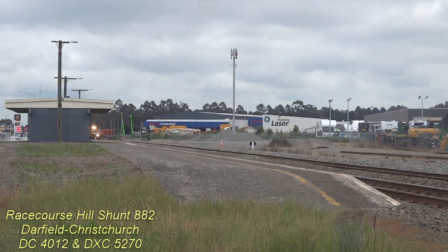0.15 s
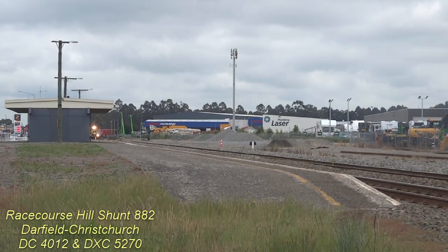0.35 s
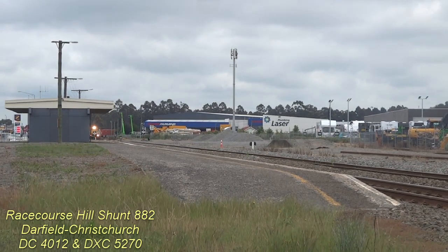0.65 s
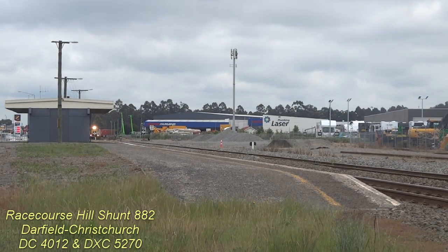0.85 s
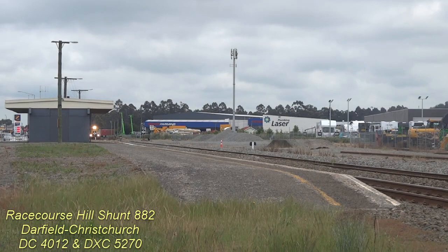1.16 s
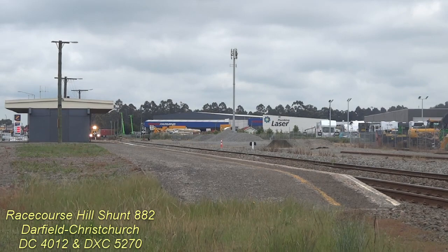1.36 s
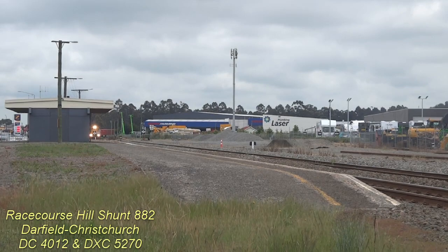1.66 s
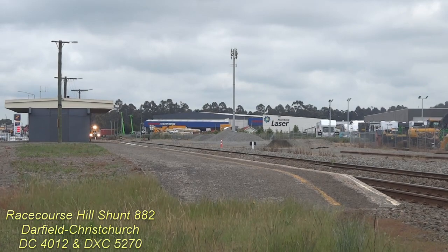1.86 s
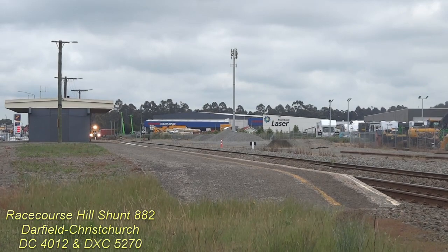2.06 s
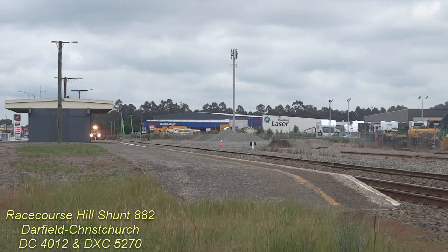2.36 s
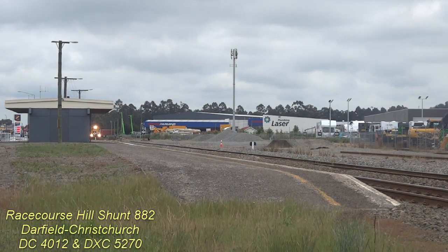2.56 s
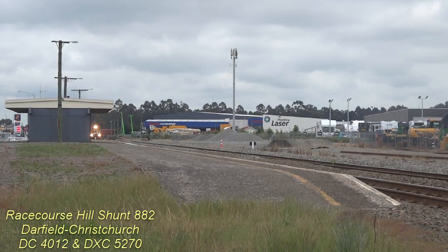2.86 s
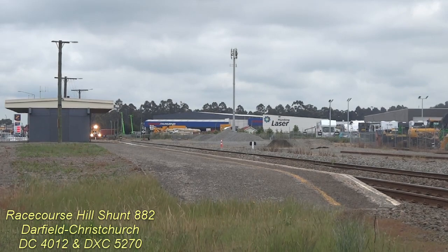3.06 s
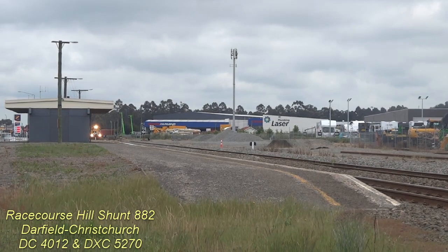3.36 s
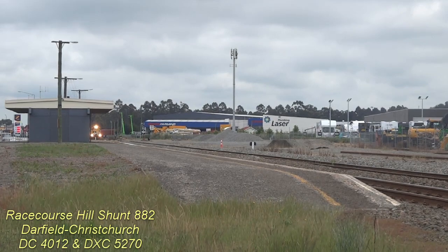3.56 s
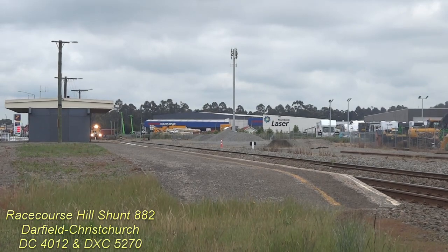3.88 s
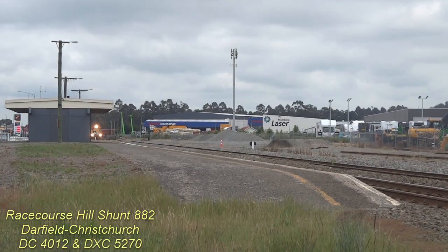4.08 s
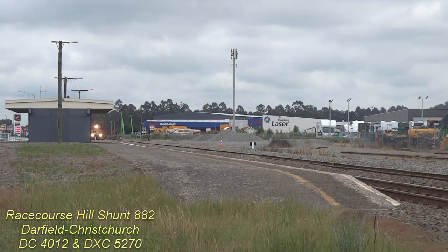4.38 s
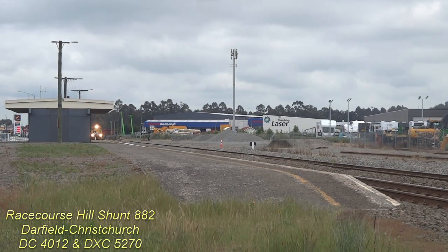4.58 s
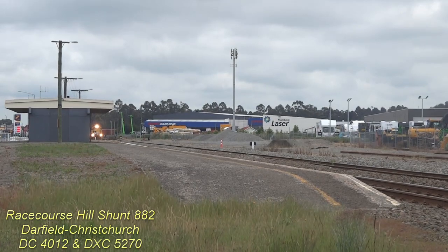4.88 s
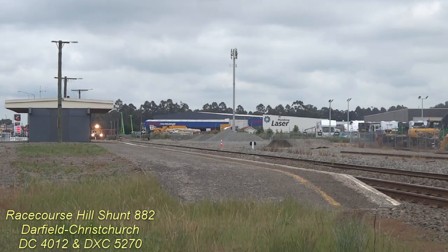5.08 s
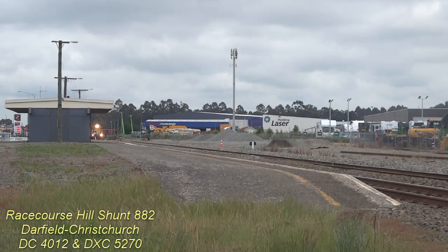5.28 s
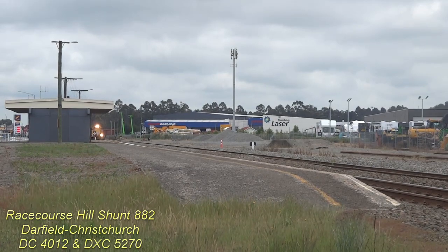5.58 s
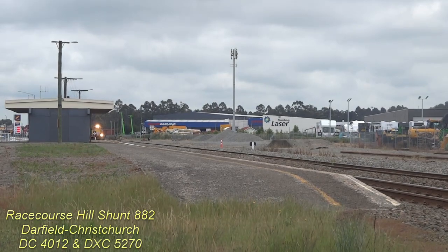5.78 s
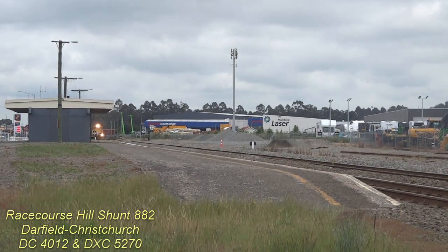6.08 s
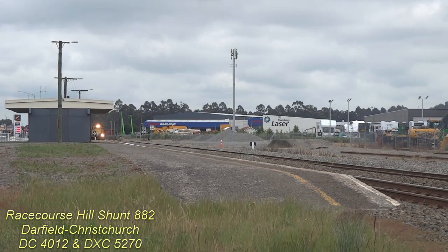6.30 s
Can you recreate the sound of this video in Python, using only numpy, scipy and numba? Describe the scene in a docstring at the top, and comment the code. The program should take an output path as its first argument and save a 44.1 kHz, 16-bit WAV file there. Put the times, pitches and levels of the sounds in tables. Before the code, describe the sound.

Crossing bells ring out of step as a far-off diesel train throbs and hisses, under gusts thudding on the microphone.

```python
"""From the start, gusts buffet both ports of a microphone beside a railway, while far off a diesel train
rumbles over road and yard noise, air escapes in blasts and two crossing bells clang out of step.
Near 0.7 s a bird chirps and two low tones sound. From 1.5 s the far sound dips under some hard gusts.
An air brake whistles at 2 s, chains jingle at 3.5 s, and the bird returns after 5.3 s.
Throughout, a limiter holds the peaks of the wind."""
import sys
import numpy as np
from scipy import signal
from scipy.fft import rfft, irfft, next_fast_len
from scipy.io import wavfile
from scipy.ndimage import uniform_filter1d, minimum_filter1d, map_coordinates
from numba import njit

SR = 44100
rng = np.random.default_rng(int(sys.argv[2]) if len(sys.argv) > 2 else 0)


def unload_audio(sound):
    """Save the sound as a 16-bit wav file, at the path given as the first command line argument."""
    columns = np.transpose(np.atleast_2d(sound))
    # keep every value between -1 and 1, then stretch to whole-number steps
    steps = np.round(np.clip(columns, -1, 1) * 32767)
    wavfile.write(sys.argv[1], SR, steps.astype(np.int16))


N = 284004


def amp(db):
    """Decibels as an amplitude ratio."""
    return 10 ** (np.asarray(db) / 20)


def unit(x):
    """Normalisation to rms 1."""
    return x / np.sqrt(np.mean(x ** 2) + 1e-20)


def along(points, hz):
    """Interpolation of (frequency_hz, value) points on a log axis."""
    f, v = np.transpose(points)
    return np.interp(np.log(hz + 1), np.log(f + 1), v)


def curves(rows):
    """Linear interpolation, sample by sample, of each column after the time."""
    times, *columns = np.transpose(rows)
    return [np.interp(np.arange(N) / SR, times, column) for column in columns]


def wobble(rate):
    """A smooth random curve with rate knots a second."""
    return map_coordinates(rng.standard_normal(int(N * rate / SR) + 4), [np.arange(N) * rate / SR])


def jitter(count, size):
    """Noise of rms 1, smoothed over size samples."""
    return unit(uniform_filter1d(rng.standard_normal(count), size=size))


def swell(start, rise, hold, fall):
    """An envelope of linear rise, hold and exponential decay."""
    t = np.arange(N) / SR - start
    return np.clip(t / rise, 0, 1) * np.exp(-np.maximum(t - rise - hold, 0) / fall)


def filtered(x, response):
    """Filtering: the spectrum times a frequency response."""
    m = next_fast_len(N + SR // 2)
    return irfft(rfft(x, m) * response(np.fft.rfftfreq(m, 1 / SR)), m)[..., :N]


def rush(spectrum, correlation, patchy_db=0):
    """Partly coherent stereo noise of rms 1, with patches of random gain in time and frequency."""
    cells = signal.stft(rng.standard_normal((2, N + 512)), nperseg=512)[2]
    patches = uniform_filter1d(rng.standard_normal(cells.shape[1:]), size=8, axis=0)
    patches = unit(uniform_filter1d(patches, size=16, axis=1))
    pair = signal.istft(cells * amp(patchy_db * patches), nperseg=512)[1][:, :N]
    angle = lambda hz: np.arccos(np.clip(along(correlation, hz), -1, 1)) / 2
    gain = lambda hz: amp(along(spectrum + [(SR / 2, -120)], hz))
    mid, side = filtered(pair, lambda hz: gain(hz) * [np.cos(angle(hz)), np.sin(angle(hz))])
    return unit(np.array([mid + side, mid - side]))


def evened(x, share, size):
    """Compression: a share of the level swings, taken over size samples, is removed."""
    strength = np.sqrt(np.abs(uniform_filter1d(np.mean(x ** 2, axis=0), size=size)) + .02)
    return x / strength ** share


def wind():
    """Turbulent pressure at the ports: large eddies thud and small ones flutter, in breeze and puffs."""
    # Spectra of large and of small eddies: frequency_hz, density_db
    large = [(25, -37), (45, -9), (65, -9.5), (90, -0.5), (140, -1), (250, -31.5), (500, -69)]
    small = [(60, -22), (120, -16), (170, 0.5), (250, -6.5), (380, -19), (600, -31.5), (1200, -81)]
    # Coherence between the ports: frequency_hz, correlation
    ports = [(30, 1), (60, 0.99), (100, 0.51), (160, 0.88), (270, 0.058), (500, 0.32)]
    # Wind between the puffs: time_s, level_db
    breeze = [(0, -26), (.9, -21), (1.25, -21.5), (1.42, -30), (1.66, -31), (1.8, -17.5), (2.05, -24),
              (2.35, -16), (2.52, -24), (2.95, -27.5), (3.5, -25.5), (3.85, -28), (4.1, -26.5),
              (4.5, -23.5), (4.75, -20), (5.0, -25), (5.42, -20), (5.65, -24), (6.2, -26.5), (6.44, -18)]
    # Single hard eddies: start_s, length_s, thud_db, flutter_db
    puffs = [(0.156, 0.047, -22, -25.5), (0.263, 0.031, -16.5, -34), (0.43, 0.079, -12, -22.5),
             (0.66, 0.058, -16, -12), (0.86, 0.1, -34, -28.5), (1.006, 0.038, -10, -10),
             (1.088, 0.069, -12, -14.5), (1.206, 0.13, -12.5, -15.5), (1.533, 0.079, -11, -6),
             (1.693, 0.062, -13, -11), (1.803, 0.079, -11, -10), (1.918, 0.083, -11, -10),
             (2.071, 0.032, -16.5, -28), (2.26, 0.048, -19, -10.5), (2.354, 0.053, -11, -9),
             (2.426, 0.054, -10.5, -14.5), (3.105, 0.083, -16.5, -25.5), (3.285, 0.051, -14.5, -17.5),
             (3.368, 0.12, -19.5, -31), (3.517, 0.074, -27, -25), (3.604, 0.043, -9, -16.5),
             (3.661, 0.057, -15.5, -18.5), (4.162, 0.035, -11, -32), (4.243, 0.052, -19, -27),
             (4.32, 0.079, -16.5, -22), (4.436, 0.031, -10, -26), (4.518, 0.033, -10.5, -16.5),
             (4.732, 0.084, -18, -15), (4.878, 0.06, -19.5, -18), (5.048, 0.068, -15.5, -12.5),
             (5.13, 0.046, -20, -12), (5.202, 0.092, -16.5, -14.5), (5.446, 0.062, -13, -15),
             (5.513, 0.041, -14, -12.5), (5.696, 0.03, -14, -25), (5.8, 0.092, -15.5, -24),
             (5.909, 0.041, -10, -18), (6.03, 0.051, -15, -21), (6.095, 0.051, -13.5, -26.5),
             (6.357, 0.072, -16.5, -23), (2.16, 0.056, -16, -32), (4.67, 0.049, -17.5, -22),
             (5.395, 0.03, -19, -16.5)]
    breeze_db, = curves(breeze)
    flutter_db = breeze_db.mean() - 6 + 1.2 * (breeze_db - breeze_db.mean())  # weaker, swings wider
    lumps = wobble(22)
    thud = unit(amp(1.65 * lumps) * evened(rush(large, ports), 0.25, size=1300))
    port_lumps = np.array([wobble(40), wobble(40)])
    flutter = unit(amp(3.9 * lumps + 2.8 * port_lumps) * evened(rush(small, ports), 0.23, size=700))
    puff_gain, t = np.zeros((2, N)), np.arange(N) / SR
    edge = 0.29  # share of a puff spent swelling, and again fading
    for start, length, *db in puffs:
        inside = .5 + (.5 - np.abs((t - start) / length - .5)) / edge
        puff_gain += np.outer(amp(db), np.sin(np.pi / 2 * np.clip(inside, 0, 1)) ** 2)
    puff_thud = puff_gain[0] * unit(evened(rush(large, ports), 0.27, size=900))
    puff_flutter = puff_gain[1] * unit(amp(3.8 * port_lumps) * evened(rush(small, ports), 0.74, size=500))
    pressure = amp(breeze_db) * thud + amp(flutter_db) * flutter + puff_thud + puff_flutter
    return pressure * amp([[.1], [-.1]])


def diesels():
    """Attenuation with distance: only the lowest throb of the engines carries this far."""
    # Strength of the throb: time_s, level_db
    levels = [(0, -28), (1.9, -23.5), (2.75, -27), (3.2, -25), (4.4, -23.5), (5.7, -24.5), (6.44, -25.5)]
    # Its spectrum: frequency_hz, density_db
    throb = [(18, -27), (28, -18), (42, -7), (60, 3), (75, 0), (110, -34), (200, -77)]
    return amp(curves(levels)[0]) * evened(rush(throb, [(25, .8), (60, 1.0)]), 0.26, size=3000)


def far_roar():
    """Scintillation: train and road noise swells and fades in turbulent air; air blasts brighten it."""
    # Slow drift: time_s, roar_db, middle_swell_db, hiss_swell_db
    drift = [(0, -24.5, 1.5, 1), (.8, -24.5, 1, 0.5), (1.5, -27, 0, -2), (2.1, -29.5, 0.5, 2.5),
             (2.9, -28.5, -0.5, 1), (3.26, -27, -0.5, -1), (3.6, -28, 1.5, 2), (5.0, -27.5, 1, 4),
             (5.4, -27, 2, 3), (6.2, -24.5, 4, 4), (6.44, -25.5, 2.5, 1)]
    # Spectra, from low to high: frequency_hz, density_db
    traffic = [(60, -46), (110, -12), (170, -4), (340, -21.5), (600, -14.5), (950, -10.5), (1330, -16.5),
               (1700, -25.5), (2300, -47)]  # road and wagons
    whoosh = [(1200, -5.5), (1550, 1.5), (2000, 0), (2350, -3.5), (2800, -7), (3400, -73)]
    rolling = [(2300, -34), (2800, 3.5), (3300, 1), (4300, -1), (5200, -8.5), (7000, -68)]  # tyres and wheels
    hiss = [(4000, -57), (5200, -1.5), (7000, -3), (8800, -5), (10500, -12.5), (12000, -40)]
    top_hiss = [(9000, -33), (10500, 0), (12000, -1), (13500, -2), (15000, -7), (16000, -20)]
    # Background in the four bands from whoosh up: level_db, db_per_swell_db
    bands = [(-31, 1.26), (-40.5, 0.9), (-48.5, 1.16), (-62, 1.15)]
    # Coherence between the ports: frequency_hz, correlation
    coherence = [(60, 0.78), (300, 0.56), (750, 0.99), (2000, 0.9), (5500, 0.91), (9000, 0.99),
                 (15000, 0.99)]
    # Level difference: frequency_hz, left_over_right_db
    pan = [(100, 4.5), (700, 1), (1200, 3), (2200, -0.5), (4000, 2.5), (8000, 1)]
    # Phase difference: frequency_hz, left_lag_rad
    lag = [(200, 0.73), (600, 0.51), (1300, 0.64), (3000, 0.073), (6000, 0.125), (15000, 0)]
    roar_db, middle_db, hiss_db = curves(drift)
    swells_db = [middle_db, middle_db, hiss_db, hiss_db]
    background = np.array([amp(db + slope * swing) for (db, slope), swing in zip(bands, swells_db)])
    whoosh_gain, rolling_gain, hiss_gain, top_gain = np.sqrt(background ** 2 + air_blasts())
    roar = amp(roar_db) * rush(traffic, coherence, patchy_db=1.2)
    roar += whoosh_gain * rush(whoosh, coherence, patchy_db=1.2)
    treble = rolling_gain * rush(rolling, coherence, patchy_db=1.53)
    treble += hiss_gain * rush(hiss, coherence, patchy_db=1.3)
    treble += top_gain * rush(top_hiss, coherence, patchy_db=1.2)
    far = roar + amp(0.36 * wobble(14)) * treble
    half = np.array([[.5], [-.5]])
    return filtered(far, lambda hz: amp(half * along(pan, hz)) * np.exp(-1j * half * along(lag, hz)))


def air_blasts():
    """Incoherent addition: blasts of air sum as power in the whoosh, rolling, hiss and top hiss bands."""
    # Blasts: start_s, rise_s, hold_s, fade_s, hiss_db, top_hiss_db
    vents = [(0.035, 0.062, .04, 0.13, -51, -53), (.42, .2, .03, .08, -58, -54.5),
             (1.72, .05, 0.037, .02, -45, -62), (1.98, .025, 0.098, .25, -45, -51),
             (3.415, .12, .02, 0.069, -50, -59), (4.1, .15, .1, 0.23, -59, -56)]
    return sum(np.outer(amp([db + 12.5, db + 1.5, db, top_db]), swell(*timing)) ** 2
               for *timing, db, top_db in vents)


def crossing_bells():
    """Superposition: each blow adds to the earlier ring, and the two bells' close modes beat."""
    # Each bell's hammer: reference_blow_s, period_s
    hammers = [(.33, .4116), (.28, .3876)]
    # Modes of two castings of one pattern: pitch_hz, relative_db, t60_s
    castings = [
        [(1420, 0, 2), (1916.6, 0, 2), (2446.2, 0, 3.5)],
        [(1427.6, 2, 2), (1926, -3, 2), (2460, -6, 2.5), (3015, -21, 1.5)],
    ]
    # Borders of four bands that part the modes: edge_hz
    edges = [0, 1700, 2200, 2454, 4000]
    # The first bell's high partial: time_s, level_db
    high_partial = [(0, -38), (.2, -32), (.38, -45), (.65, -35), (1.2, -51), (1.4, -32.5), (1.8, -28.5),
                    (2.0, -30), (2.2, -30.5), (2.7, -31.5), (3.2, -39), (3.55, -28.5), (3.75, -37),
                    (4.0, -30), (4.5, -40.5), (4.78, -32.5), (5.1, -36), (6.44, -36.5)]
    t, both = np.arange(3 * SR) / SR, 0
    for (reference, period), modes in zip(hammers, castings):
        ring = sum(amp(db - 60 * t / t60) * np.sin(2 * np.pi * hz * t) for hz, db, t60 in modes)
        ring *= 1 - np.exp(-t / 0.011)
        times = reference + period * np.arange(-5, 17) + rng.normal(0, 2e-5, 22)
        blows = np.zeros(N + 4 * SR)  # begins 2 s early: the bells are already ringing
        blows[np.round((times + 2) * SR).astype(int)] = amp(rng.normal(0, 1, len(times)))
        both = both + signal.fftconvolve(blows, ring)[2 * SR:][:N]
    bands = [unit(filtered(both, lambda hz: (hz >= lo) & (hz < hi))) for lo, hi in zip(edges, edges[1:])]
    levels_db = [-33.5, -39.5, *curves(high_partial), -40.5]
    heard = sum(amp(db + 0.51 * wobble(4.97)) * band for db, band in zip(levels_db, bands))
    late = np.pad(heard, (2, 0))[:N]  # the sound reaches the left port later
    return np.array([late * amp(-2.5), heard * amp(-1.03)])


def bird():
    """Frequency modulation: random wavering makes each gliding whistle hoarse."""
    # Chirps: start_s, length_s, from_hz, to_hz, level_db
    chirps = [(0.716, 0.02, 3530, 4150, -31.5), (.737, 0.022, 3800, 3930, -40),
              (.765, .025, 3870, 3730, -34.5), (.785, 0.031, 4200, 4230, -38), (5.33, .14, 4200, 4350, -42),
              (5.488, 0.13, 4300, 4210, -42), (5.621, 0.094, 4200, 4200, -39),
              (5.839, 0.11, 4300, 4200, -46)]
    out = np.zeros(N)
    for start, length, from_hz, to_hz, db in chirps:
        progress = np.linspace(0, 1, round(length * SR))
        hoarse_hz = 190 * jitter(len(progress), size=80)
        phase = 2 * np.pi * np.cumsum(from_hz + (to_hz - from_hz) * progress + hoarse_hz) / SR
        envelope = amp(db) * np.sqrt(np.abs(np.sin(np.pi * progress)))
        out[round(start * SR):][:len(phase)] += envelope * np.sin(phase)
    return out


def low_tones():
    """Simple harmonic motion: two short pure tones under half-sine envelopes."""
    # Tones: start_s, length_s, pitch_hz, level_db
    tones = [(0.781, 0.042, 685, -21.5), (0.844, 0.095, 659, -28.5)]
    out = np.zeros(N)
    for start, length, hz, db in tones:
        t = np.arange(round(length * SR)) / SR
        envelope = amp(db) * np.sin(np.pi * t / length)
        out[round(start * SR):][:len(t)] += envelope * np.sin(2 * np.pi * hz * t)
    return out


def gust_dips():
    """Amplitude modulation: a gain that dips briefly at the set times of five hard gusts."""
    # Dips in the far sound: start_s, fall_s, return_s, depth_db
    dips = [(1.53, .05, 0.085, 4), (1.815, 0.013, 0.12, 2.5), (2.262, .008, 0.025, 2), (4.325, .01, .03, 2),
            (5.144, 0.0057, 0.013, 10)]
    hold_s = 0.0044
    return amp(-sum(db * swell(start, fall, hold_s, back) for start, fall, back, db in dips))


def air_brake():
    """Flow-excited tones: air through a closing valve whistles, sinking in pitch as the pressure falls."""
    start_s, from_hz, to_hz = 1.98, 1740, 1545
    base_hz = to_hz + (from_hz - to_hz) * swell(start_s, rise=.001, hold=0.06, fall=.13)
    phase = 2 * np.pi * np.cumsum(base_hz) / SR

    def breath(rate, ratio):
        """Narrow-band noise centred on ratio times the base pitch."""
        return wobble(rate) * np.cos(ratio * phase) + wobble(rate) * np.sin(ratio * phase)

    whistle = unit(breath(70, .985) + amp(-6) * breath(70, 1.07) + amp(-9) * breath(300, 1.03))
    stray = unit(breath(300, 1.01))  # echoes off the sheds differ from side to side
    envelope = amp(-23.5) * swell(start_s, rise=.14, hold=.32, fall=.09)
    return envelope * (whistle * amp([[.6], [-.6]]) + amp(-13.5) * np.outer([1, -1], stray))


def chains():
    """Damped free vibration: links ring briefly and unevenly, a few loud among many faint."""
    # Distinct links: start_s, pitch_hz, level_db, t60_s
    links = [(3.455, 3550, -35, .25), (3.46, 11350, -55, .4), (3.48, 8650, -49, .4), (3.53, 3650, -36, .4),
             (3.54, 11300, -51, .35), (3.555, 10400, -53, .25), (3.59, 13000, -53, .25),
             (3.605, 7500, -46, .35), (3.625, 10000, -50, .2), (3.645, 6100, -33, .09),
             (3.65, 7000, -43, .2), (3.585, 6900, -45, .4), (3.66, 11500, -53, .2), (3.665, 2900, -37, .2),
             (3.66, 5800, -41, .3), (3.695, 13000, -54, .2), (3.755, 8900, -49, .25)]
    faint = [(3.45 + .45 * when ** 1.4, 2800 * 5 ** height, -39 - 17 * height - 6 * soft, .1 + .2 * ring)
             for when, height, soft, ring in rng.random(size=(45, 4))]
    out, t = np.zeros(N), np.arange(SR // 4) / SR
    for start, hz, db, t60 in links + faint:
        phase = 2 * np.pi * hz * np.cumsum(1 + .005 * jitter(len(t), size=200)) / SR
        envelope = amp(db - 60 * t / t60) * (1 - np.exp(-t / .003))
        out[round(start * SR):][:len(t)] += envelope * np.sin(phase)
    return out


def scene():
    """Superposition of the wind at the ports and the far sources, which all dip except the diesels."""
    rumble = wind() + diesels()
    far = far_roar() + crossing_bells() + air_brake()
    far += (chains() + bird() + low_tones()) * amp([[1.2], [-1.2]])
    return rumble + gust_dips() * far


@njit
def recover(gain, step):
    """Exponential release: the gain drops at once and climbs back slowly."""
    out = gain.copy()
    for i in range(1, len(out)):
        out[i] = min(gain[i], out[i - 1] + step * (1 - out[i - 1]))
    return out


def record(dry):
    """Peak limiting with one gain for both channels, then clipping and a low-pass cut."""
    ceiling, release_s, cutoff_hz = 1.04, 0.029, 15620
    needed = np.minimum(1, ceiling / (np.abs(dry).max(axis=0) + 1e-9))
    gain = recover(minimum_filter1d(needed, size=131), 1 / (release_s * SR))
    limited = dry * uniform_filter1d(gain, size=65)
    return filtered(np.clip(limited, -1, 1), lambda hz: hz < cutoff_hz)


dry = scene()
out = record(dry)
unload_audio(out)
```